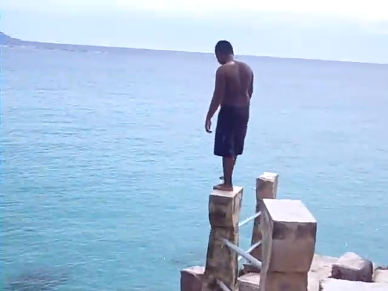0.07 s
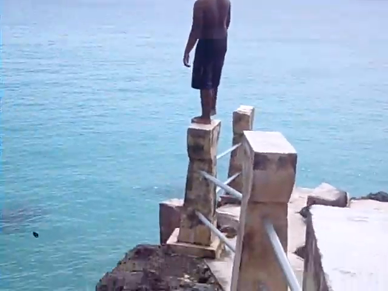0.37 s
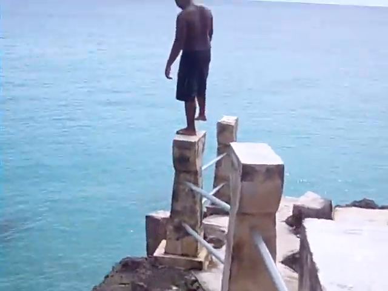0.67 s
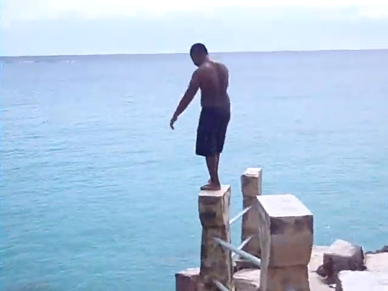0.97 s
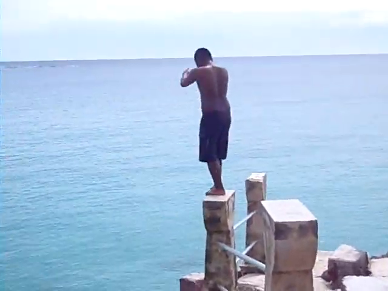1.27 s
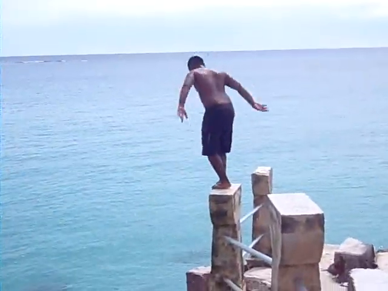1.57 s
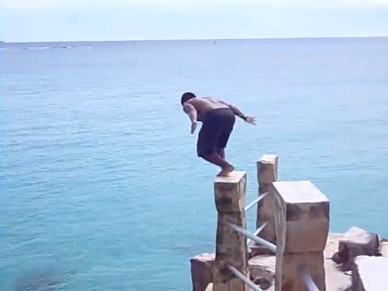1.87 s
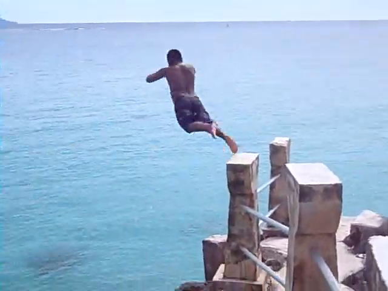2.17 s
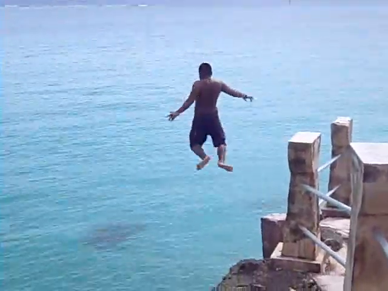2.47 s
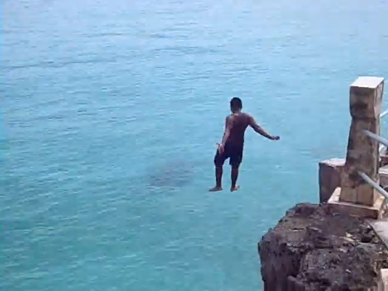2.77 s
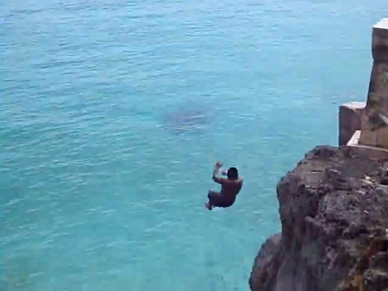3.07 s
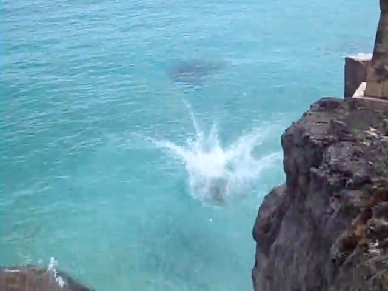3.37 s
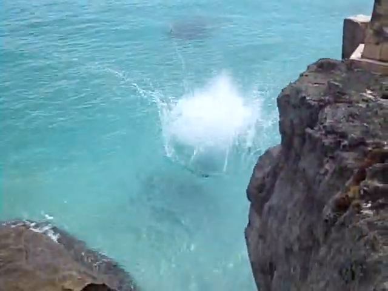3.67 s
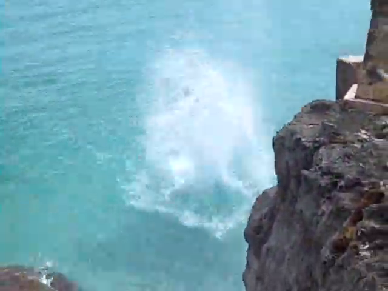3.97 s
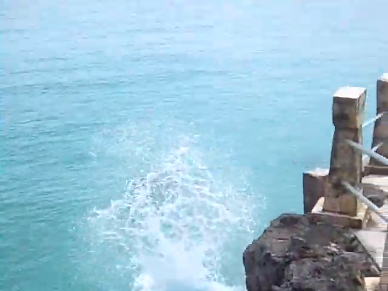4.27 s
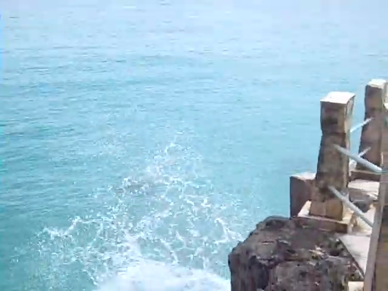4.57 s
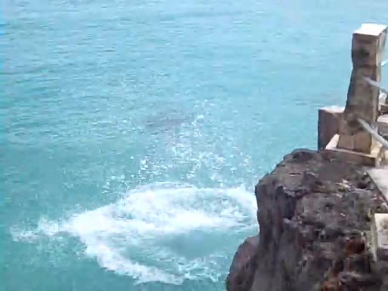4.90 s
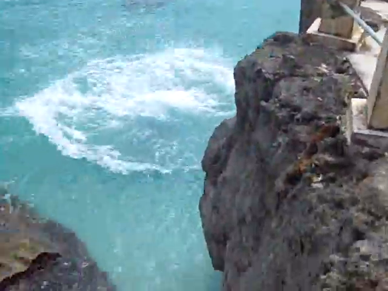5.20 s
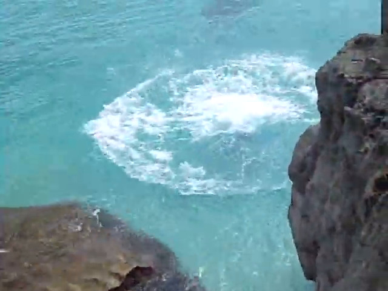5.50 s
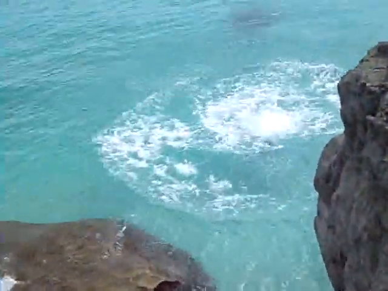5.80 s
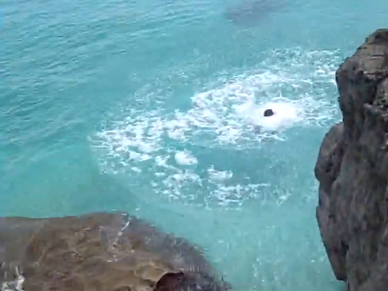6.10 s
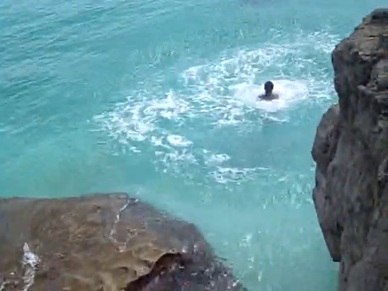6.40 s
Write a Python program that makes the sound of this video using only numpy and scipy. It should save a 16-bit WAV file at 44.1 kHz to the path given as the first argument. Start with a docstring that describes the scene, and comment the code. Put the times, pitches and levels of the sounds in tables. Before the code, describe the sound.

A faint, steady hiss of calm sea is heard from the rocks above, with small waves washing and fizzing and occasional tiny bubble plips. A few dry, close ticks come at about 0.2 to 0.4 seconds, and soft low puffs of wind nudge the microphone from 0.5 to 1.2 seconds and again near 2.7. At 3.4 seconds a jumping person hits the water with one sharp smack, by far the loudest sound, with a brief hollow ring. A grainy rip of water and a short gurgle follow at once, then a soft low thud near 3.8 seconds. From there, hissing spray and churning water build as the splash rains back, peaking around 5.2 seconds, with several sharp splats between 4.7 and 5.5. The spray then dies away, leaving quiet foam fizzing on the sea until the end at about 6.5 seconds.

```python
"""Small waves wash and fizz on the rocks, with a few dry ticks and wind nudging the microphone.
Then someone jumping from a cliff hits the calm sea below: the feet tick on the surface, the body smacks
and sets a pocket of trapped air ringing, and the hole behind it gurgles and closes with a thud.
A plume shoots up and rains back as spray, each drop a tiny ring, leaving foam to fizz on the water."""
import sys
import numpy as np
from scipy import signal
from scipy.fft import rfft, irfft, next_fast_len
from scipy.io import wavfile

SR = 44100
rng = np.random.default_rng(int(sys.argv[2]) if len(sys.argv) > 2 else 0)


def generate_wav(signal):
    """Clip the signal to [-1, 1] and save it as 16-bit WAV at the path in sys.argv[1]."""
    frames = np.transpose(np.atleast_2d(signal))
    scaled = np.clip(frames, -1, 1) * 32767
    pcm = np.round(scaled).astype(np.int16)
    wavfile.write(sys.argv[1], SR, pcm)


N = 288678
TIME = np.arange(N) / SR
CUTOFF_HZ = 12400


def from_db(db):
    """Decibels to gain."""
    return 10 ** (np.asarray(db) / 20)


def rms_one(x):
    """Scale to unit power."""
    return x / np.sqrt(np.mean(x ** 2) + 1e-20)


def add(track, t, sound):
    """Drop a short sound into a track at t seconds."""
    start = round(t * SR)
    track[start:start + len(sound)] += sound[:N - start]


def together(gains):
    """Gain of unrelated layers heard at once; their powers add."""
    return np.sqrt(sum(gain ** 2 for gain in gains))


def envelope(start, rise, t60, hold_until=0):
    """Power builds steadily, may be held, then dies away; times in seconds."""
    attack = np.sqrt(np.clip((TIME - start) / rise, 0, 1))
    release_s = np.maximum(TIME - max(start + rise, hold_until), 0)
    return attack * np.exp(-np.log(1000) * release_s / t60)


def bursts(rows):
    """Gain of bursts that swell exponentially to a peak at t and die; their powers add."""
    power = np.zeros(N)
    for t, level_db, rise, t60 in rows:
        near = slice(max(round((t - 10 * rise) * SR), 0), round((t + 2 * t60) * SR))
        age = TIME[near] - t
        shape = np.exp(np.minimum(age / rise, -np.log(1000) * age / t60))
        power[near] += (from_db(level_db) * shape) ** 2
    return np.sqrt(power)


def shower(peak_s, spread_s, level_db):
    """Gain of water whose landing times scatter round one moment."""
    return from_db(level_db) * np.exp(-.5 * ((TIME - peak_s) / spread_s) ** 2)


def flutter(per_s, depth_db):
    """A gain that wanders at random."""
    knots = rng.standard_normal(4096)
    return from_db(depth_db * np.interp(TIME * per_s, np.arange(len(knots)), knots))


def coloured(x, eq):
    """Shape a sound with an EQ curve, falling steeply beyond its ends; rms 1."""
    size = next_fast_len(N)
    hz, level_db = np.transpose(eq)
    f = np.maximum(np.fft.rfftfreq(size, 1 / SR), 1)
    skirts = np.minimum(f / hz[0], 1) ** 2 * np.minimum(hz[-1] / f, 1) ** 3
    curve = from_db(np.interp(np.log(f), np.log(hz), level_db))
    return rms_one(irfft(rfft(x, size) * skirts * curve, size)[:N])


def ring(clicks, hz, t60):
    """A resonator: a unit click sets a sine of height 1 ringing."""
    r = np.exp(-np.log(1000) / (t60 * SR))
    w = 2 * np.pi * hz / SR
    return signal.lfilter([0, np.sin(w)], [1, -2 * r * np.cos(w), r * r], clicks + 1e-18)


def grains(per_s, spread_db):
    """Random impacts, many small and a few large; rms 1."""
    chance, luck = rng.random((2, N))
    hits = np.flatnonzero(chance < per_s / SR)
    sizes = from_db(spread_db * np.minimum(-np.log(luck[hits]), 4))
    clicks = np.zeros(N)
    clicks[hits] = sizes * (-1) ** hits
    return rms_one(clicks)


def water(eq, per_s, spread_db, cycles, blur_db, count=18):
    """Drops and bubbles, each ringing a few cycles at its pitch, over a blur of countless tiny ones."""
    top_hz = min(eq[-1][0], CUTOFF_HZ)
    pitches = np.geomspace(max(eq[0][0], top_hz / 20), top_hz, count)
    clicks = grains(per_s, spread_db)
    # small bubbles outnumber large ones
    dealt = np.searchsorted(np.cumsum(pitches) / pitches.sum(), rng.random(N))
    rings = sum(ring(np.sqrt(hz) * clicks * (dealt == k), hz, cycles / hz)
                for k, hz in enumerate(pitches))
    return coloured(rms_one(rings) + from_db(blur_db) * rng.standard_normal(N), eq)


def snaps(rows, middle_t60, width, size=2048):
    """Each tiny impact is a noise burst in a band round its pitch; low ones last longer."""
    out, age = np.zeros(N), np.arange(size) / SR
    middle_hz = np.median([hz for t, peak_db, hz in rows])
    for (t, peak_db, hz), noise in zip(rows, rng.standard_normal((len(rows), size))):
        edges_hz = [hz / (1 + width), min(hz * (1 + width), CUTOFF_HZ)]
        band = signal.butter(2, edges_hz, "band", fs=SR, output="sos")
        burst = noise * np.exp(-np.log(1000) * age / middle_t60 * hz / middle_hz)
        snap = signal.sosfilt(band, burst) + from_db(-17) * burst
        add(out, t, from_db(peak_db) * snap / np.abs(snap).max())
    return out


# EQ of the distant sea: f/Hz, level/dB
SEA_EQ = [(25, -7), (50, -13), (72, -0.5), (115, -11.5), (220, -5.5), (350, -0.5), (550, -2.5), (1050, 2),
          (1500, -1.5), (2100, 0), (2800, -4), (4000, -3.5), (5400, -11), (11000, -15)]
def open_sea():
    """The bed: a far, gently wavering hiss of open water."""
    return from_db(-60) * coloured(rng.standard_normal(N), SEA_EQ) * flutter(per_s=35, depth_db=1.5)


def foam_gains(start_s=5.31, rise_s=0.6):
    """Wash and fizz gains of the foam left by the splash, a long slow tail."""
    return (from_db(-57) * envelope(start_s, rise_s, t60=54),
            from_db(-60.5) * envelope(start_s, rise_s, t60=19))


# small waves breaking and draining: t/s, rise/s, t60/s, wash level/dB, fizz level/dB
WAVES = [(.27, 0.077, 0.52, -65.5, -67.5), (1.03, 0.033, 1.5, -73, -68), (1.5, 0.038, 3.5, -55.5, -69),
         (1.68, 0.042, 4.5, -56, -64.5), (2.74, 0.064, 2, -59, -60), (2.95, 0.19, 0.8, -62.5, -65)]
# EQs of the wash's body and the bright fizz on top: f/Hz, level/dB
WASH_EQ = [(90, -12.5), (200, -4), (300, -6.5), (420, -2), (560, -4), (800, -2), (1100, -3), (1400, -4),
           (2000, -4), (3000, -8), (4500, -9.5)]
FIZZ_EQ = [(2500, -7), (4000, -3), (6000, -1.5), (9000, -3), (12000, -10.5)]
def surf():
    """Bubbles wash and fizz in the wavelets on the rocks and in the foam, over a faint crackle."""
    wash, fizz = foam_gains()
    for t, rise, t60, wash_db, fizz_db in WAVES:
        wave = envelope(t, rise, t60)
        wash = together([wash, from_db(wash_db) * wave])
        fizz = together([fizz, from_db(fizz_db) * wave])
    wash *= water(WASH_EQ, per_s=900, spread_db=1.5, cycles=16.7, blur_db=4.5)
    fizz *= water(FIZZ_EQ, per_s=1700, spread_db=2, cycles=5.6, blur_db=0)
    crackle = from_db(-72.5) * coloured(grains(per_s=77, spread_db=4.5), FIZZ_EQ)
    return wash + fizz + crackle


# single bubbles among the rocks: t/s, level/dB, f/Hz
PLIPS = [(0.019, -46, 1340), (.17, -46, 1990), (.338, -44.5, 2530), (.392, -50, 945), (1.524, -41, 4030),
         (1.777, -46, 3000), (2.779, -49, 1200)]
def plips(cycles=16, glide=0.093, size=2048):
    """A bubble rings briefly, bending up in pitch as it nears the surface."""
    out, age = np.zeros(N), np.arange(size) / SR
    for t, level_db, hz in PLIPS:
        life = hz * age / cycles
        tone = np.sin(2 * np.pi * hz * age * (1 + glide * life / 2))
        shape = (1 - np.exp(-hz * age)) * np.exp(-2 * life)
        add(out, t, from_db(level_db) * tone * shape)
    return out


# puffs of wind on the microphone: t/s, level/dB, f/Hz
PUFFS = [(.488, -43.5, 149), (.591, -51, 110), (0.624, -45, 190), (.661, -52, 70), (.719, -51, 70),
         (.913, -41.5, 146), (1.004, -56, 90), (1.188, -55.5, 83), (1.221, -59, 46), (2.654, -54, 90),
         (2.769, -53.5, 110)]
# EQ of the rumble round each puff: f/Hz, level/dB
RUMBLE_EQ = [(25, -7), (70, -3), (160, -11), (300, -19.5)]
def wind(rumble_db=-17, rise_s=0.067, t60_s=0.48, damping=1.07, size=4096):
    """A ragged rumble; each larger eddy pushes the diaphragm once and lets it swing back."""
    breeze = bursts([(t, peak_db + rumble_db, rise_s, t60_s) for t, peak_db, hz in PUFFS])
    out = breeze * coloured(grains(per_s=150, spread_db=4), RUMBLE_EQ)
    for t, peak_db, hz in PUFFS:
        turns = hz * np.arange(size) / SR
        push = turns * np.exp(-np.pi * damping * turns) * np.sin(2 * np.pi * turns)
        add(out, t, from_db(peak_db) * push / np.abs(push).max())
    return out


# small ticks: t/s, level/dB, f/Hz
TICKS = [(.2235, -36, 6000), (.3, -37.5, 4860), (.3202, -42, 6500), (.3485, -37, 5000),
         (.3562, -27.5, 5150), (.358, -32.5, 8000), (.3885, -39.5, 4800), (2.754, -42, 4360)]
def ticks():
    """Tiny impacts, dry and close by."""
    return snaps(TICKS, middle_t60=0.0097, width=0.69)


# the plume's bulk falling back, heavy water first, fine spray later: t/s, spread/s, level/dB
HEAVY_FALL = (4.98, 0.25, -47.5)
FINE_FALL = (5.203, 0.27, -42.5)
# clumps slapping down: t/s, level/dB
SPLATS = [(4.87, -47), (5.035, -41), (5.155, -42), (5.185, -42.5)]
# EQs of the dark churn and the bright spray: f/Hz, level/dB
CHURN_EQ = [(40, -12.5), (110, -15.5), (200, -11), (320, -4.5), (540, -10), (850, 1), (1100, -1.5),
            (1400, -4), (1900, 1), (2300, -8), (3000, -7)]
SPRAY_EQ = [(1500, -9), (2000, -2.5), (2800, -5.5), (3700, 0.5), (4900, 0), (5600, -3), (6800, -3.5),
            (8500, -1.5), (10000, -4.5), (12000, -10)]
def plume(start_s=3.693, splat_rise_s=0.019, splat_t60_s=0.22):
    """The plume shoots up and rains back: spray patters in clumps, heavier water churns the surface."""
    splats = bursts([(t, level_db, splat_rise_s, splat_t60_s) for t, level_db in SPLATS])
    held_churn = from_db(-51.5) * envelope(start_s, rise=0.096, t60=1.5, hold_until=5.4)
    held_spray = from_db(-45.5) * envelope(start_s, rise=0.53, t60=0.54, hold_until=5.483)
    churn = together([held_churn, shower(*HEAVY_FALL), from_db(-6) * splats])
    spray = together([held_spray, shower(*FINE_FALL), splats])
    clumps = flutter(per_s=78, depth_db=0.74)
    churn *= water(CHURN_EQ, per_s=1300, spread_db=2.5, cycles=12.5, blur_db=5.5)
    spray *= water(SPRAY_EQ, per_s=5500, spread_db=3, cycles=6, blur_db=1.5)
    return clumps * (churn + spray)


# gouts of water landing: t/s, level/dB, f/Hz
GOUTS = [(4.6718, -31.5, 4730), (5.1477, -30.5, 2040), (5.1825, -28, 4890), (5.3092, -30, 4300),
         (5.3633, -29, 4200), (5.4665, -29, 3930)]
def gouts():
    """Lumps of water hit the sea, sharp accents in the spray."""
    return snaps(GOUTS, middle_t60=0.031, width=0.32)


# sheets of water tearing: t/s, level/dB, rise/s, t60/s
SHEETS = [(3.3625, -29, 0.00017, 0.016), (3.369, -42.5, .002, 0.23), (3.399, -22.5, 0.0045, 0.067),
          (3.415, -34, 0.0041, 0.19), (3.535, -47, 0.085, 0.78), (3.85, -51, 0.067, .5)]
# EQ of the tearing: f/Hz, level/dB
SHEET_EQ = [(500, -13), (1200, -2), (1800, 3.5), (2800, -9), (3600, 0.5), (5000, -1.5), (6500, -6.5),
            (8000, -2.5), (12000, -9)]
def sheets():
    """A dense, grainy rip as the entry and the rising jet tear off sheets of water."""
    return bursts(SHEETS) * coloured(grains(per_s=16000, spread_db=4), SHEET_EQ)


# surges of water into the hole: t/s, level/dB, rise/s, t60/s
SURGES = [(3.408, -30.5, 0.0084, 0.19), (3.45, -41, .04, 1), (3.53, -36.5, 0.027, 0.17)]
# EQ of the hole: f/Hz, level/dB
CAVITY_EQ = [(70, -21), (170, -14), (350, -1), (520, -6.5), (790, -0.5), (1050, -6.5), (1300, -16),
             (1800, -9), (2600, -14), (4000, -17)]
def gurgle():
    """Large bubbles ring as water rushes into the hole behind the body."""
    return bursts(SURGES) * water(CAVITY_EQ, per_s=2600, spread_db=2, cycles=8.7, blur_db=1.5)


# the closing thud and its tail: t/s, level/dB, rise/s, t60/s
THUDS = [(3.787, -39.5, 0.0083, 0.11), (3.94, -56.5, 0.076, .2)]
# EQ of the thud: f/Hz, level/dB
THUD_EQ = [(20, -2), (45, 0), (90, -6.5), (150, -10), (270, -0.5), (480, -13), (850, -11), (1400, -22)]
def thud(collapse_hz=48):
    """The hole pinches shut with a low pulse and the sunken air rumbles."""
    pulse = np.cos(2 * np.pi * collapse_hz * (TIME - THUDS[0][0]))
    rumble = coloured(rng.standard_normal(N), THUD_EQ)
    return bursts(THUDS) * (rumble + from_db(-5) * pulse)


def glug(peak_s=3.38, level_db=-49.5, rise_s=0.022, t60_s=0.1, top_hz=375, octaves_per_s=12):
    """One soft, hollow tone that swells and slides up into the smack."""
    hz = top_hz * 2 ** (octaves_per_s * np.minimum(TIME - peak_s, 0))
    tone = np.sqrt(2) * np.sin(2 * np.pi * np.cumsum(hz) / SR)
    return bursts([(peak_s, level_db, rise_s, t60_s)]) * tone


# legs, seat and back hitting the water: t/s, drive level/dB, hardness f/Hz
SLAPS = [(3.3957, -16, 3000), (3.398, -2, 10000), (3.4006, 1.5, 2160), (3.4023, -14, 5000),
         (3.4056, -24, 8000)]
# tight modes of the trapped air and crater, then the hollow after-ring: f/Hz, level/dB, t60/s
POCKET_MODES = [(348, -18, 0.024), (826, -10.5, 0.013), (994, -25.5, 0.031), (1740, -10.5, 0.015),
                (3470, -15.5, 0.0093), (7600, -30, .002)]
HOLLOW_MODES = [(326, -44, 0.21), (823, -47, 0.16), (1860, -40, 0.11), (2520, -44, 0.18)]
def smack(low_cut_hz=210, size=256):
    """Slaps a few milliseconds apart squeeze the trapped air; broad flesh makes a softer pulse."""
    blows = np.zeros(N)
    for t, level_db, hard_hz in SLAPS:
        pulse = np.exp(-2 * np.pi * hard_hz * np.arange(size) / SR)
        add(blows, t, -from_db(level_db) * pulse / pulse.sum())
    rings = sum(ring(blows, hz, t60) * from_db(db) for hz, db, t60 in POCKET_MODES + HOLLOW_MODES)
    # a crater this small radiates little bass
    return signal.sosfilt(signal.butter(2, low_cut_hz, "high", fs=SR, output="sos"), rings)


def scene():
    """The mono mix from the rocks above: shore ambience, the entry and the falling water."""
    ambience = ticks() + open_sea() + surf() + plips() + wind()
    entry = glug() + smack() + sheets() + gurgle() + thud()
    return (ambience + entry + plume() + gouts())[None]


def record(dry, rolloff_hz=10000):
    """A small microphone whose top end rolls off and is then cut."""
    soft = signal.sosfilt(signal.butter(8, rolloff_hz, fs=SR, output="sos"), dry)
    return signal.sosfilt(signal.ellip(10, .2, 80, CUTOFF_HZ, fs=SR, output="sos"), soft)


dry = scene()
out = record(dry)
generate_wav(out)
```